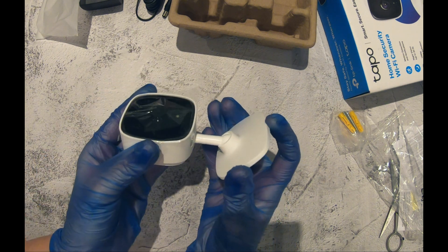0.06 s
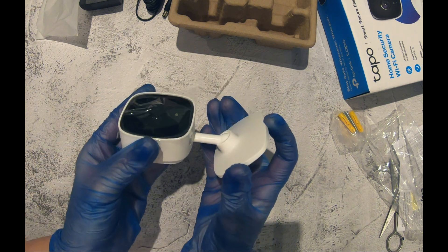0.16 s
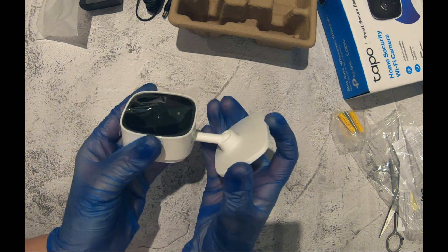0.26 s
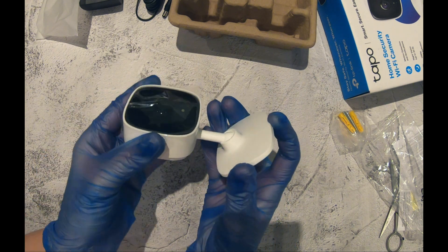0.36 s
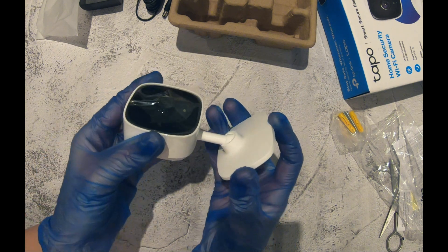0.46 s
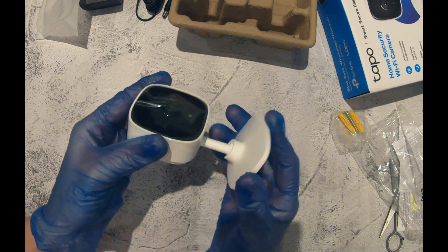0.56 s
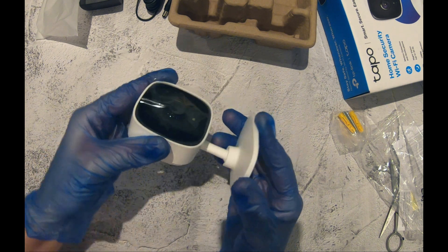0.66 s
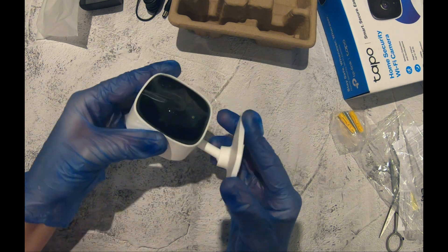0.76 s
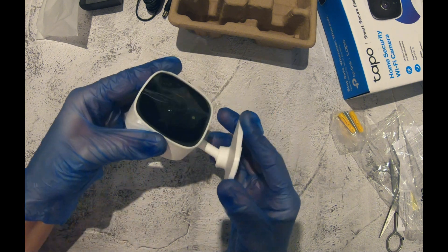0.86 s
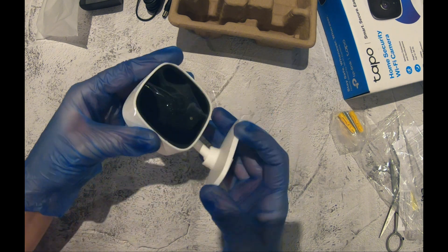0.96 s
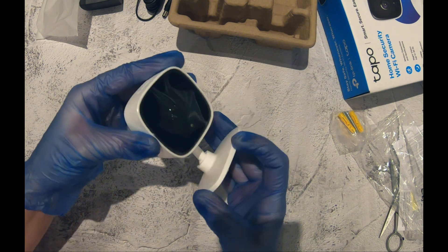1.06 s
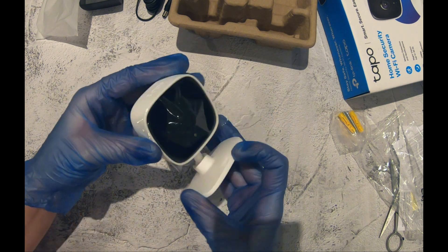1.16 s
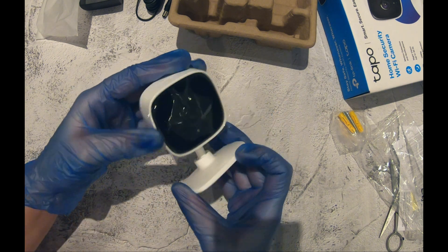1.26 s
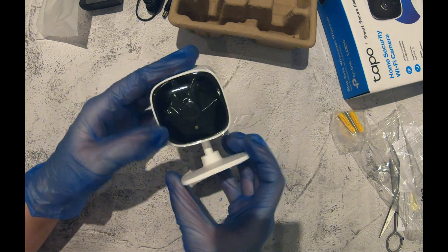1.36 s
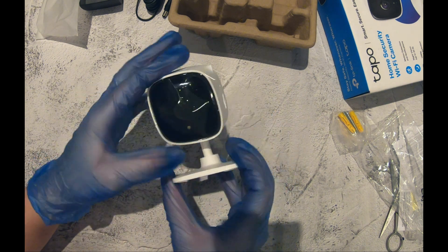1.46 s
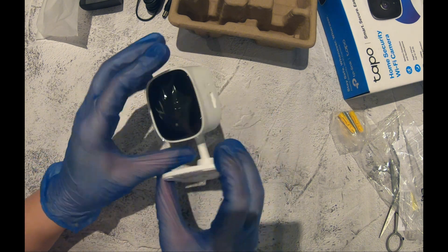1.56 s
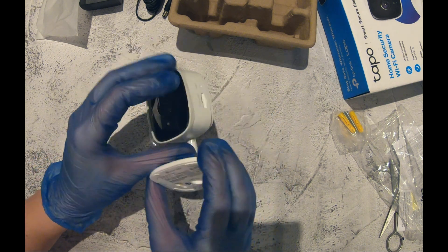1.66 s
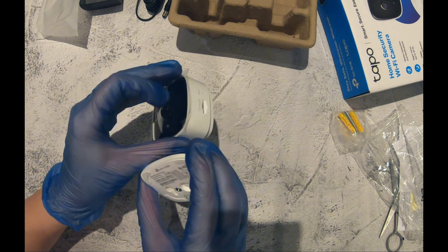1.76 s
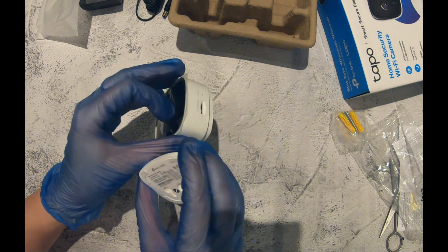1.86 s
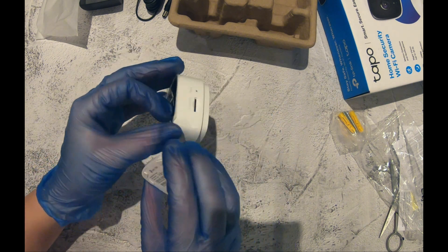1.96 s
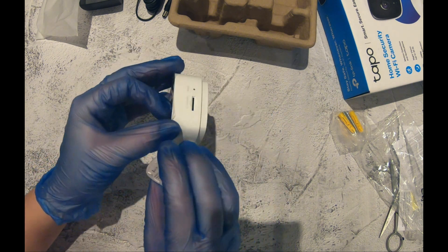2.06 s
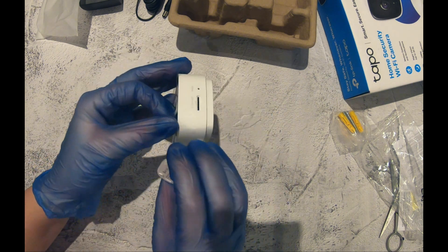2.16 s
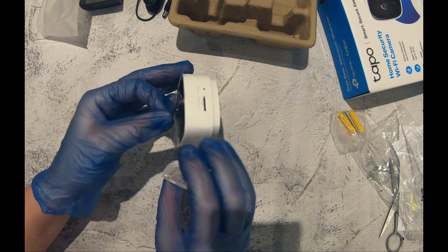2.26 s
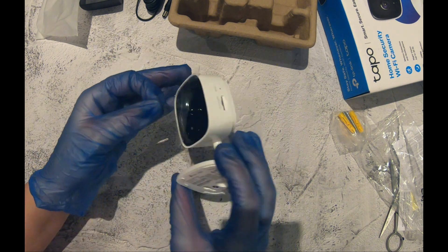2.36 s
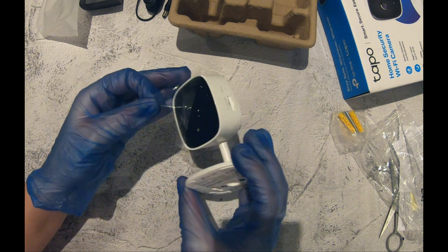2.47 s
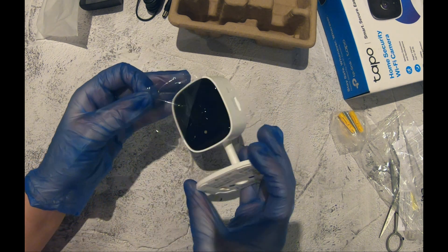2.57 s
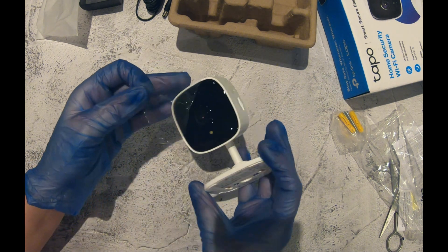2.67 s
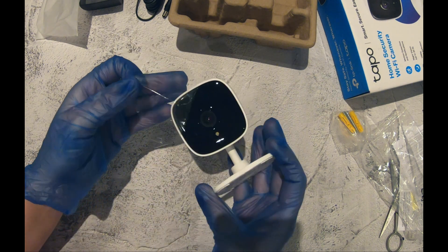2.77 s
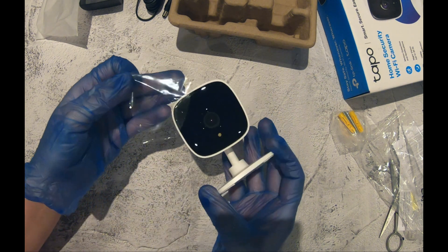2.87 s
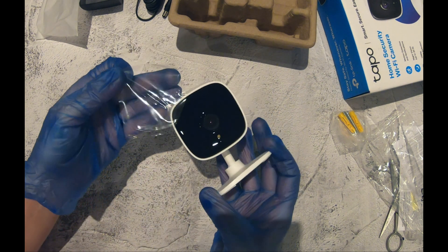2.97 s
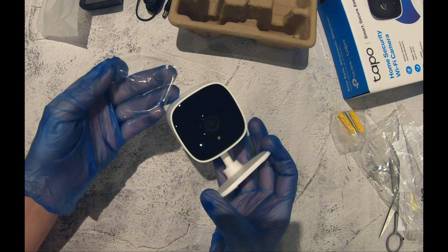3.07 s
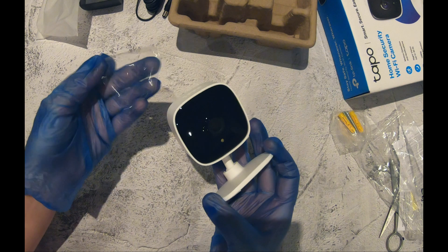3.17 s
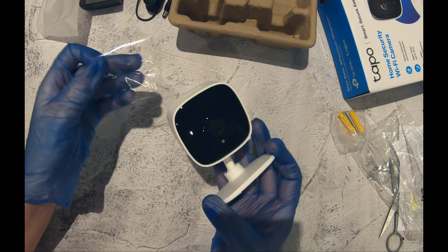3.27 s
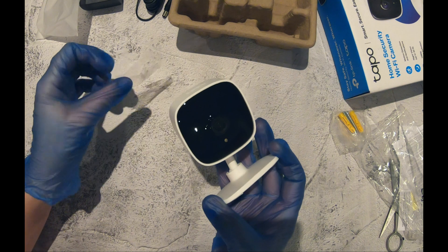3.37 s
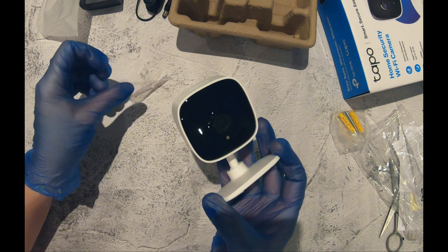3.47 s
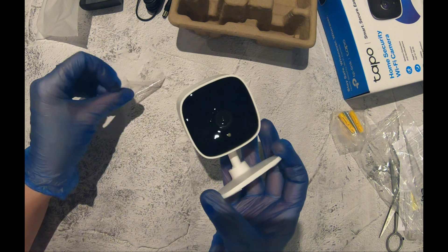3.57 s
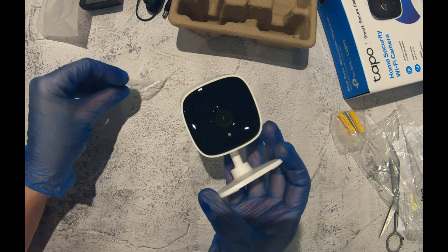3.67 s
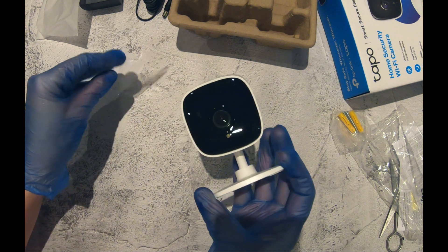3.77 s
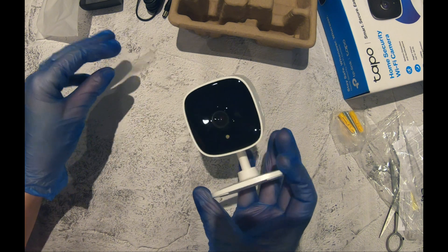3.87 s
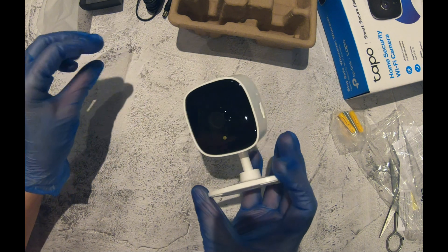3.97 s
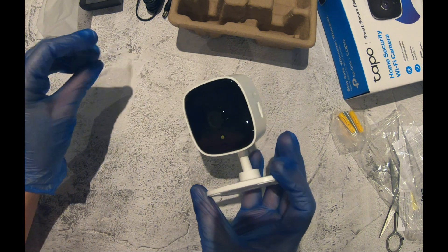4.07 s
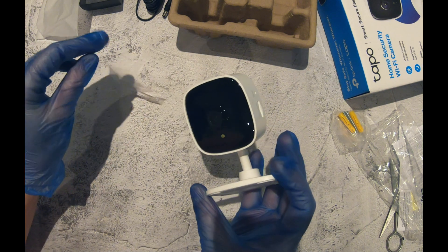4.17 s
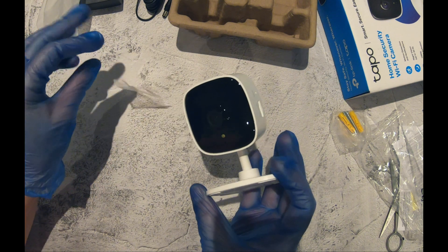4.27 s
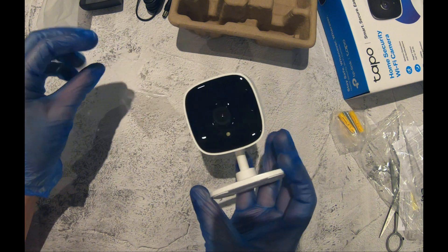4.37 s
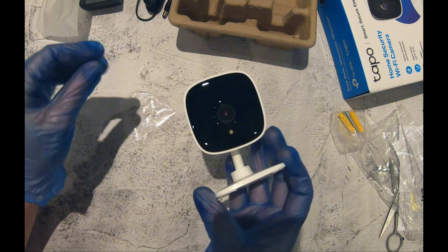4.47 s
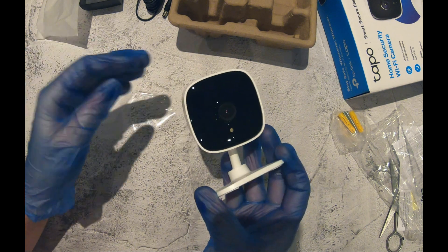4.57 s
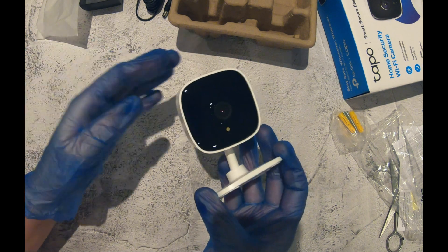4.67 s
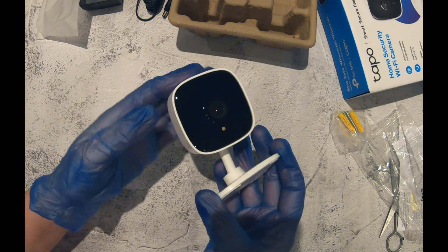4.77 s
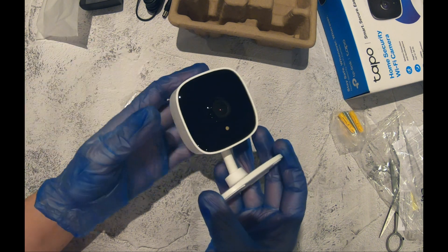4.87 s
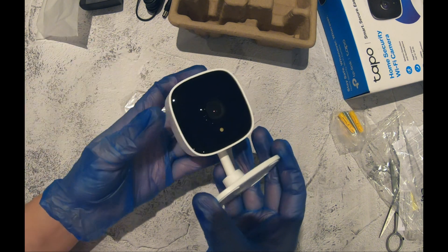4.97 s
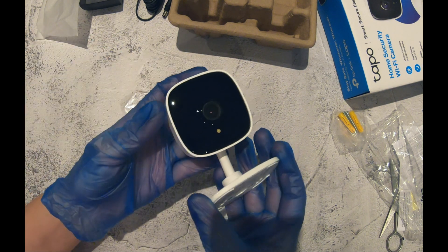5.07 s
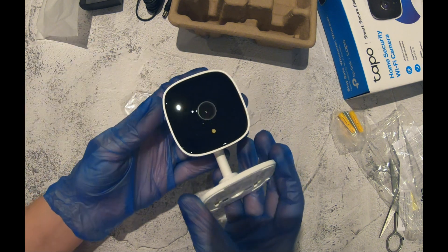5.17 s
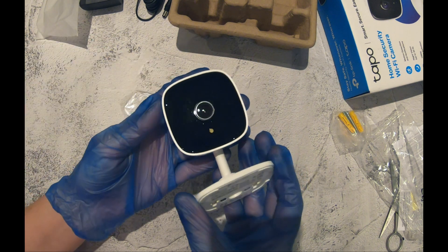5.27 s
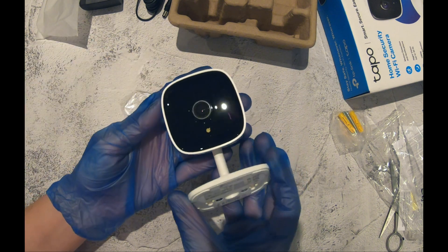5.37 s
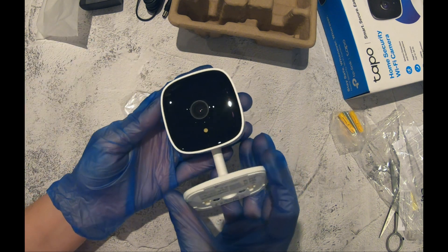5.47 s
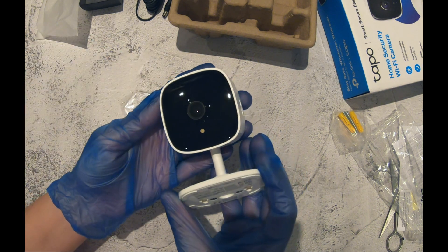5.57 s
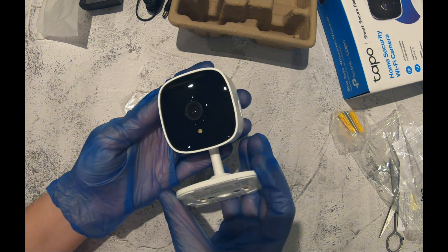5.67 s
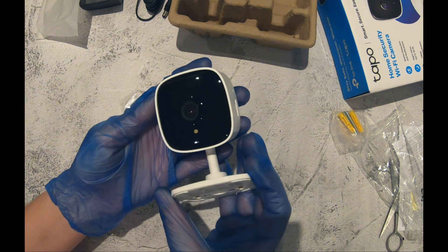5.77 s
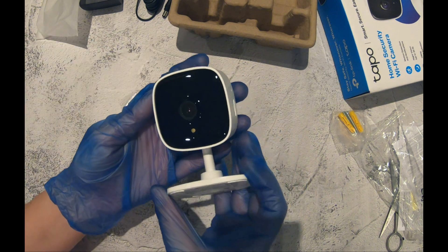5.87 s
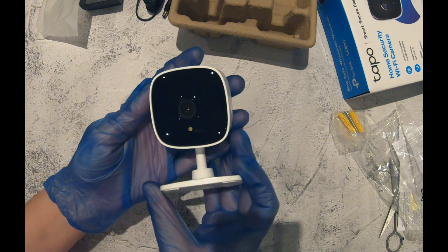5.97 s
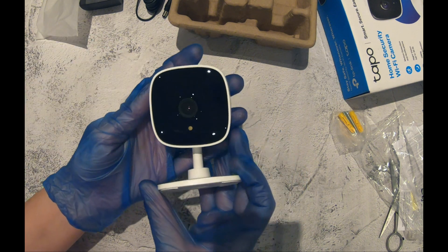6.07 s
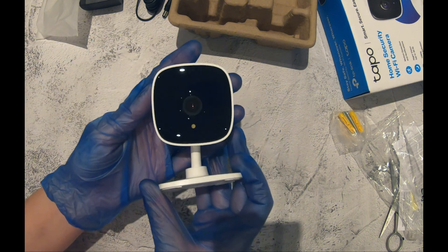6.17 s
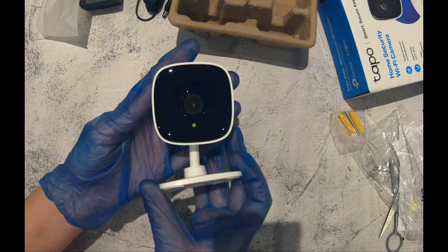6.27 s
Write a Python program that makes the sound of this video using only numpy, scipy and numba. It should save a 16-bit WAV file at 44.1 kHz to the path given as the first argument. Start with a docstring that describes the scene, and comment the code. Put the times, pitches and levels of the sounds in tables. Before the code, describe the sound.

Thin plastic gloves handle a small hollow plastic device close to the microphone in a small room. For the first two seconds there is soft rubbing and sliding with scattered light clicks, a finger dragging over the shell and a sharper click at about 1.5 seconds. At about 2.3 seconds a clinging film starts to peel off with a brief scrape that falls in pitch. It becomes a much louder, bright, crackling rustle with quick runs of ticks and sharp snaps, the strongest between 2.6 and 3 seconds. After 3.2 seconds the loose film and gloves crinkle softly, with a few small ticks and a light tap at about 4.3 seconds. From 5 seconds to the end, just past 6, only very faint rubbing remains. Faint distant traffic murmurs throughout, with a low wavering hum that dies away at around 4 seconds.

```python
"""Peeling film off a plastic device

Thin plastic gloves turn a small hollow plastic device over a table, peel a clinging film off its
front and flick it away. Gloves and film rustle in dense tiny slips, single creases snap, and the
shell rings briefly. Distant traffic murmurs through the walls, with a low wavering hum."""
import sys
import numpy as np
from scipy import signal
from scipy.fft import rfft, irfft, next_fast_len
from scipy.io import wavfile
from numba import njit

SR = 44100
rng = np.random.default_rng(int(sys.argv[2]) if len(sys.argv) > 2 else 0)


def bounce(signal):
    """Save signal as a 16-bit WAV file at the path given by the first command-line argument."""
    frames = np.transpose(np.atleast_2d(signal))
    limited = np.clip(frames, -1, 1)
    pcm = np.round(limited * 32767).astype(np.int16)
    wavfile.write(sys.argv[1], SR, pcm)


N = 279153

# Strokes of rubbing and peeling. Rise and fall each span 20 dB; the last three are relative levels. # (peak
# time [s], level [dB], rise [ms], fall [ms], treble [dB], shell body [dB], film hump [dB])
RUB_STROKES = [(0.026, -87, 85, 16.5, -7, -14, -20), (0.263, -81.0, 107.5, 53, -5, 1, -21),
               (0.402, -79.5, 42, 50, -12, -11, -12), (0.556, -74.5, 111, 141, -9, -7, -14),
               (0.676, -64, 74, 107.5, -7.5, -9.0, -22), (0.848, -80, 159, 150, -7, -11, -18),
               (1.03, -80.5, 155, 108, -1, -1, -15), (1.13, -77, 181, 348, 1.5, 0, -14),
               (1.294, -67.5, 96, 54, -24, -3, -30), (1.423, -62, 209.5, 62, -1, -6.5, -26),
               (1.498, -59.5, 27, 73, 1, -4, -25), (1.624, -63, 47, 90, -4.5, -8.0, -13),
               (1.787, -68, 90, 110, -10, -4.5, -20), (1.882, -73.5, 57, 85.5, -7.5, -11, -18),
               (2.06, -64.5, 101, 89, -4, -9.0, -26), (2.211, -69.5, 18.5, 26, -6, 3, -20),
               (2.34, -58, 118, 44, 3, -1, -22), (2.375, -45, 77, 83, 4, -13.5, -33),
               (2.443, -42, 125, 30, 4.5, -8, -12), (2.496, -42.5, 157.5, 74, -2.5, -8, -18),
               (2.579, -39, 64, 60, -8, -12.5, -30), (2.629, -47, 41.5, 51, 5.5, -2.5, -20),
               (2.668, -45.5, 16, 102, -5.5, -9.5, -25), (2.716, -41.5, 13, 9, -7, -5, -16),
               (2.767, -48, 12, 45, -4, -1.5, -5), (2.863, -50, 56, 116, 3, -9, -8),
               (2.936, -44.5, 33, 49.5, -0.5, -9.5, -8), (2.999, -52.5, 5.5, 98, -2.5, -9.5, -22),
               (3.108, -55.5, 22, 125, -3.5, -8, -24), (3.153, -51, 70.5, 28.5, 3, -2.5, -14),
               (3.302, -71, 15, 186, 3, 0, -31), (3.378, -65.5, 94, 54.5, -9.5, -19, -28),
               (3.433, -72, 34, 350, -5, -5.5, -18), (3.578, -68.5, 28, 13, -4, -12.0, -20),
               (3.633, -63.5, 49, 34.5, -9, -6, -18), (3.734, -69, 153, 53, 1, -5, 3),
               (3.86, -64.0, 126, 48, 0.5, -15.5, -4), (3.92, -74, 83, 152.5, -7, -9, -24),
               (4.12, -73, 128, 350, -1, -18, -18), (4.202, -63, 59, 81.5, 0.5, -8, -16),
               (4.244, -69, 21, 39, 3, -23, -10), (4.326, -65.5, 22, 100, -1, 3, -22),
               (4.424, -68, 60, 85, -10, -12, -14), (4.457, -69, 26, 353, 0.5, -13, -21),
               (4.606, -66.5, 55, 100.5, -5, -14, -13), (4.736, -74.5, 73, 145, -8, -10, 5),
               (4.82, -76.5, 43, 40.5, -5, -12, -16), (4.92, -89.5, 348, 325, 3, -1, 2),
               (5.083, -89.5, 10, 153, 1, 5, -16), (5.226, -87.5, 34, 116, -3.5, 4, -8.5),
               (5.789, -81.5, 26, 112, 3.5, -2, -1), (6.027, -83.0, 141, 242, -5.5, -2, -12),
               (6.239, -84.5, 63.5, 121, -5.0, 4.5, -2)]
# Tone of the gloves and film as the microphone hears them, with the microphone's dip near 8.8 kHz and its drop
# above 10.5 kHz: (frequency [Hz], level [dB])
RUSTLE_TONE = [(250, -33.5), (600, -17.5), (1200, -14.5), (2200, -5), (4200, 0), (8200, 1), (8800, -1.5),
               (10200, 0), (10800, -11), (12300, -5), (15500, -18)]
# How alike the rustle is on the left and right: (frequency [Hz], likeness [1 = the same])
RUSTLE_LIKENESS = [(300, .75), (1000, .8), (2500, .93), (5000, .62), (9000, .45), (15000, .45)]
# Pitches at which the hollow shell rings: (pitch [Hz], width [Hz], boost [dB]); in the rubbing each rings at
# half this width
SHELL_RINGS = [(2030, 360, 3), (3510, 660, 6.5), (4820, 117, 5.5), (6250, 680, 6), (8000, 840, 5),
               (10060, 1200, 7.5), (11990, 1100, 7.5)]
# The film lets go in runs of ticks:
# (start [s], end [s], rate [ticks/s], first level [dB], last level [dB])
TICK_RUNS = [(2.237, 2.282, 134, -68, -38), (2.56, 2.608, 270, -49, -32.5), (2.666, 2.7, 280, -30, -50),
             (2.768, 2.784, 270, -42.5, -40.5), (2.815, 2.863, 200, -41.5, -30.5),
             (3.087, 3.122, 267, -56, -44.5)]
# Snapping creases and taps: (time [s], level [dB], pitch [Hz], ring length [cycles],
# pulse centre [Hz], thump level [dB], left over right [dB])
CREASE_SNAPS = [ (0.392, -52, 1320, 15, 3100, -60, -1), (0.636, -46.5, 2770, 23, 3550, -61, -2),
                (0.968, -48, 860, 15, 1500, -75, 1), (1.172, -50, 3470, 9, 6000, -75, -9),
                (1.269, -46, 3340, 20, 3430, -76, -5), (1.497, -31, 4700, 24, 6040, -78, 5),
                (1.4994, -25.5, 4350, 28, 4450, -85, -1), (1.5014, -31, 2250, 23, 1050, -83, 1.5),
                (1.624, -37, 3350, 25, 3300, -57, .4), (1.763, -46.5, 3110, 8, 1480, -60, 2),
                (1.883, -47, 1500, 9.3, 3500, -77, 1), (2.035, -37, 3850, 11, 7020, -67, -2),
                (2.0362, -47, 1480, 21, 2490, -77, 3), (2.206, -47, 1470, 18, 3480, -54, 3),
                (2.263, -42, 10100, 12, 6000, -75, 3), (2.559, -25, 3600, 22, 1990, -50, .4),
                (2.647, -21, 3400, 12, 6760, -89, 1), (2.695, -32.5, 3400, 37, 5940, -80, -4),
                (2.7122, -29, 3500, 11, 6500, -73, 6.5), (2.7158, -18.5, 2050, 10, 5040, -104, 1.5),
                (2.7237, -33.5, 5600, 7.3, 3450, -58, -20), (2.7439, -24, 6200, 7.3, 4020, -86, 2.5),
                (2.75, -27, 6250, 9.9, 4960, -82, -4), (2.7627, -27, 6000, 17, 3460, -71, 8.8),
                (2.804, -29.5, 3600, 2.7, 2570, -67, 3), (2.822, -31, 8300, 10, 4540, -71.5, 6),
                (2.935, -19.5, 4790, 10, 3540, -65, 2), (2.998, -14.5, 3560, 9.3, 5500, -63.5, -2.4),
                (3.0037, -25.5, 4900, 51, 3430, -74, .4), (3.038, -37, 2000, 23, 810, -50.5, 1),
                (3.074, -50.5, 700, 19, 5000, -68, -3), (3.093, -38, 3400, 13, 6000, -75, 4),
                (3.150, -34.5, 2300, 42, 880, -52, 0), (3.302, -44, 6100, 27, 8000, -73, 5),
                (3.477, -47.5, 856, 8, 2200, -63, 9.5), (3.564, -42, 8280, 31, 9950, -51, 5),
                (3.595, -47.5, 6000, 30, 5800, -69, 3), (4.3206, -28, 1560, 8, 2750, -44, 2),
                (4.35, -36, 770, 4.4, 2900, -64, 2)]
# Air pocket under the lifting film: (time [s], pitch [Hz], level [dB])
POCKET_GLIDE = [(2.26, 3800, -120), (2.29, 3660, -68), (2.315, 3300, -51), (2.34, 2440, -43),
                (2.365, 1980, -41.5), (2.385, 1810, -42), (2.4, 1350, -41.5), (2.42, 880, -69),
                (2.53, 558, -59), (2.57, 562, -46), (2.61, 556, -61.5), (2.66, 545, -120)]
# A finger dragged over the shell: (peak time [s], level [dB], rise [ms], fall [ms])
FINGER_DRAGS = [(1.2, -71, 250, 100), (1.275, -59, 65, 110), (1.43, -62.5, 200, 52)]
# Tone of the traffic through the walls: (frequency [Hz], level [dB])
TRAFFIC_TONE = [(15, -37), (25, -15), (64, -15.5), (102, -22.5), (155, -5.5), (281, -10), (320, -14.5),
                (449, -15.5), (489, -18.5), (780, -4), (1300, -16.5), (1670, -19.5), (2210, -30),
                (4000, -43), (5200, -59), (8800, -120)]
# Slow swell of the traffic: (time [s], level [dB], left over right [dB], tyre hiss boost [dB])
TRAFFIC_SWELL = [(0.0, -68.5, -1, 2.5), (0.46, -67.5, -1.5, 2), (0.97, -66, -0.5, 2.5),
                 (1.89, -70, -2, 5.5), (2.5, -67, 0, 5), (3.26, -70, -1, 3.5), (4.28, -69, -1, 6),
                 (4.9, -67, -1.5, 1.5), (5.5, -66.5, -2, 4.5), (6.33, -66.5, -0.5, 1.5)]
# How alike the traffic is on both sides: (frequency [Hz], likeness [1 = the same, below 0 = opposed])
TRAFFIC_LIKENESS = [(25, 0.53), (60, 0.85), (180, 0.62), (550, -0.54), (1650, -0.38), (4970, -1.2),
                    (15000, -0.36)]
# Low boom of the room under the traffic: (time [s], level [dB])
BOOM_LEVELS = [(0.0, -72), (0.32, -68), (0.67, -75.5), (0.69, -67), (1.87, -75), (1.97, -79), (1.99, -66.5),
               (2.7, -78), (2.71, -65), (2.75, -71), (2.82, -63), (2.86, -76.5), (3.52, -72.5), (3.56, -67),
               (3.68, -75), (4.28, -83), (4.32, -63), (4.41, -73), (4.48, -66), (4.53, -86), (4.62, -65.5),
               (4.95, -67.5), (5.01, -78), (5.85, -68.5), (5.89, -76), (6.33, -70)]
# Lowest pitches at which the room rings: (pitch [Hz], width [Hz], level [dB])
ROOM_RINGS = [(157.1, 12, 1), (199.7, 20, -2), (228.4, 8.97, -8.5), (58.9, 16, -17.5), (134, 10, -2.5)]
# Wavering low hum: (time [s], level [dB])
HUM_LEVELS = [(0.0, -70), (0.34, -72.5), (0.47, -85.5), (0.75, -62.5), (1.34, -82), (1.37, -90),
              (1.61, -71), (1.72, -80), (2.37, -61.5), (2.49, -78), (2.53, -65.5), (3.45, -78), (3.57, -63),
              (4.01, -101), (4.1, -81)]
# A far engine: (time [s], firing pitch [Hz], level [dB])
ENGINE_RUN = [(0, 111, -100), (.6, 114.5, -85), (1, 114.2, -75.5), (1.8, 115, -78.5), (2.4, 116.2, -77),
              (2.7, 118, -100)]

CRACKLE_SHARE = 0.49   # the rest of the rubbing is smooth sliding
HOLLOW_HZ, HOLLOW_WIDTH_HZ = 5620, 2800   # the crumpled film's bright hump
DRAG_HZ, DRAG_WIDTH_HZ = 3310, 440
PULSE_DB, SNAP_TAIL_FADE_S = -4, 0.0078   # a fade time is the time to drop by 60 dB
HUM_HZ, HUM_RISE_HZ_PER_S = 134.5, 1.6
ROOM_FADE_S, ROOM_DB = 0.1, -13
HISS_DB, CUTOFF_HZ = -84.5, 16000
SIDES = np.array([[1], [-1]])   # left, right
TONE_GRID_HZ = np.linspace(0, SR / 2, 1025)
# Tone of the microphone's hiss: (frequency [Hz], level [dB])
HISS_TONE = [(1000, -39), (2500, -5), (6500, -9), (8500, -13), (10300, -15.5), (11000, -16.5), (15500, -30)]


def rustle():
    """Gloves and film slide and crackle; the sound rings in the shell, and the crumpled film adds a bright
    hump."""
    level_db, treble_db, body_db, hollow_db = swells(RUB_STROKES)
    sliding = rng.standard_normal((2, N))
    source = np.sqrt(1 - CRACKLE_SHARE) * sliding + np.sqrt(CRACKLE_SHARE) * crackle()
    rubbing = source[0].copy()
    for hz, width_hz, db in SHELL_RINGS:
        ring = signal.lfilter(*signal.iirpeak(hz, 2 * hz / width_hz, SR), rubbing)
        source[0] += amp(db - 16 + 6.2 * drift(17)) * ring   # the shifting grip frees and damps it
    sound = colour(stereo(source, RUSTLE_LIKENESS), at_hz(RUSTLE_TONE, TONE_GRID_HZ))
    body = signal.sosfiltfilt(pass_filter(2000, "low"), sound)
    treble = signal.sosfiltfilt(pass_filter(5500, "high"), sound)
    mix = unit_level(sound - body - treble)   # the middle range
    mix += amp(treble_db + drift(56)) * unit_level(treble)
    mix += amp(body_db) * unit_level(body)
    mix += amp(hollow_db) * band(rubbing, HOLLOW_HZ, HOLLOW_WIDTH_HZ)
    return amp(level_db) * mix * amp(0.45 * SIDES)


def crackle():
    """Slips come in clumps; the film cannot store enough strain for a very large one."""
    clumps = amp(1.8 * drift(70) + 3.5 * drift(220))
    clicks = unit_level(clumps * slips(per_s=1600, spread_db=2.5))
    return unit_level(np.tanh(clicks / 6))


def slips(per_s, spread_db):
    """Plastic sticks, then slips: two rows of tiny clicks of uneven size."""
    at = np.flatnonzero(rng.random(2 * N) < per_s / SR)
    sizes = amp(spread_db * np.minimum(rng.exponential(1, len(at)), 5))
    clicks = np.zeros(2 * N)
    clicks[at] = sizes * np.sign(rng.random(len(at)) - .5)
    return unit_level(clicks.reshape(2, N))


def peel_ticks():
    """The film lets go in nearly even ticks, each a short bright burst through the shell."""
    clicks = np.zeros(N)
    for start, end, per_s, first_db, last_db in TICK_RUNS:
        times = start + np.cumsum((1 + .3 * rng.standard_normal(40)) / per_s)
        level_db = np.interp(times, [start, end], [first_db, last_db]) + 1.9 * rng.standard_normal(40)
        clicks[(times * SR).astype(int)] = amp(level_db) * (times < end)
    fades = signal.lfilter([1], [1, -.85], 2 * clicks)
    middle, side = rng.standard_normal((2, N)) * fades
    return colour(middle + .4 * side * SIDES, at_hz(RUSTLE_TONE, TONE_GRID_HZ) + shell_boost_db())


def snaps():
    """A crease gives way: a sharp pulse, a brief ring, a noisy tail and a low thump."""
    t = np.arange(3000) / SR
    out = np.zeros((2, N + len(t)))
    tail_filter = pass_filter([900, 9000], "band")
    for start, level_db, hz, cycles, pulse_hz, thump_db, pan_db in CREASE_SNAPS:
        middle, side = rng.standard_normal((2, len(t)))
        noise = (middle + 0.35 * side * SIDES) * amp(-14.5 - 60 * t / SNAP_TAIL_FADE_S)
        tail = signal.sosfilt(tail_filter, noise)
        ring = np.sin(2 * np.pi * hz * t) * amp(-3.5 - 60 * t * hz / cycles)
        u = np.pi * pulse_hz * t - 3
        pulse = (1 - 2 * u ** 2) * np.exp(-u ** 2)   # a push with a dip on either side
        thump = np.sin(2 * np.pi * 200 * t) * amp(thump_db - 60 * t / 0.073)
        thump *= 1 - np.exp(-t / 0.0011)   # soft start
        snap = amp(level_db) * (ring + amp(PULSE_DB) * pulse + tail) + thump
        i = round((start + 0.0008) * SR)   # each snap sounds 0.8 ms after its listed time
        out[:, i:i + len(t)] += amp(pan_db / 2 * SIDES) * snap
    out = signal.sosfilt(pass_filter(140, "high"), out)
    return colour(out, shell_boost_db() - 2)


def shell_boost_db():
    """The hollow shell boosts sound near each pitch at which it rings."""
    return sum(db / (1 + (2 * (TONE_GRID_HZ - hz) / width_hz) ** 2) for hz, width_hz, db in SHELL_RINGS)


def air_pocket():
    """Slips ring in the air under the lifting film; the pocket grows, so its pitch falls."""
    hz, level_db = in_time(POCKET_GLIDE)
    sound = slips(per_s=3000, spread_db=0.5)[0]
    for width_hz in (850, 1200):
        sound = unit_level(gliding_ring(sound, hz, width_hz))
    return amp(level_db) * sound * amp(1.5 * drift(74))


def finger_drag():
    """A finger slips over the shell in dense clicks that ring in one hollow."""
    ring = band(slips(per_s=3300, spread_db=1)[0], DRAG_HZ, DRAG_WIDTH_HZ)
    return amp(swells(FINGER_DRAGS)[0]) * ring


def room_echo(x):
    """The small room adds a short blurred echo, different on each side."""
    t = np.arange(int(.3 * SR)) / SR
    tail = rng.standard_normal((2, len(t))) * amp(-60 * t / ROOM_FADE_S) * (t > .004)
    tail = signal.lfilter([1], [1, -.5], tail)   # soften the treble
    tail /= np.sqrt(np.sum(tail[0] ** 2))
    return amp(ROOM_DB) * signal.oaconvolve(x, tail, axes=1)[:, :N]


def traffic(noise):
    """Far traffic murmurs and swells a little, with more or less tyre hiss on top."""
    level_db, pan_db, tyres_db = in_time(TRAFFIC_SWELL)
    murmur = unit_level(colour(noise, at_hz(TRAFFIC_TONE, np.linspace(0, SR / 2, 4097))))
    tyres = signal.sosfiltfilt(pass_filter(1050, "high"), murmur)
    gain = amp(level_db + pan_db / 2 * SIDES + 0.22 * drift(5))
    return gain * (murmur + (amp(tyres_db) - 1) * tyres)


def room_boom(noise):
    """Noise booms at the lowest pitches at which the room rings."""
    grid_hz = np.linspace(0, SR / 2, 16385)
    power = sum(amp(2 * db) / width_hz / (1 + (2 * (grid_hz - hz) / width_hz) ** 4)
                for hz, width_hz, db in ROOM_RINGS)
    boom = unit_level(colour(noise, 10 * np.log10(power + 1e-12)))
    return amp(in_time(BOOM_LEVELS)[0]) * boom


def low_hum():
    """A low tone wavers in level, creeps up in pitch and dies away."""
    t = np.arange(N) / SR
    level_db = in_time(list(HUM_LEVELS) + [(4.4, -110)])[0]
    phase = 2 * np.pi * (HUM_HZ + HUM_RISE_HZ_PER_S * t / 2) * t
    return np.sqrt(2) * amp(level_db) * np.sin(phase)


def far_engine():
    """An engine drones at its firing pitch, and at half and double that pitch."""
    hz, level_db = in_time(ENGINE_RUN)
    phase = 2 * np.pi * np.cumsum(hz) / SR
    return amp(level_db) * (np.sin(phase) + amp(-6.5) * np.sin(phase / 2) + np.sin(2 * phase))


def swells(rows):
    """Strokes rise, fall and add up in power; any extra columns blend by each stroke's share."""
    peak_s, peak_db, rise_ms, fall_ms, *columns = np.transpose(rows)[:, :, None]
    t = np.arange(0, N + 44, 44) / SR
    from_peak = 1000 * np.maximum((peak_s - t) / rise_ms, (t - peak_s) / fall_ms)
    power = amp(2 * np.maximum(peak_db - 20 * from_peak ** 1.5, -200))   # 1.5 rounds the top
    total = power.sum(axis=0)
    blends = [(power * column).sum(axis=0) / total for column in columns]
    return in_time(np.transpose([t, 10 * np.log10(total)] + blends))


def amp(db):
    """Turn decibels into a multiplier."""
    return 10 ** (np.asarray(db) / 20)


def unit_level(x):
    """Scale a signal to an average (rms) level of 1."""
    return x / np.sqrt(np.mean(x ** 2) + 1e-20)


def in_time(rows):
    """Turn table columns into curves with a value at every sample."""
    times, *columns = np.transpose(rows)
    return [np.interp(np.arange(N) / SR, times, column) for column in columns]


def at_hz(rows, hz):
    """Read a table between its rows, on a log-frequency scale."""
    row_hz, values = np.transpose(rows)
    return np.interp(np.log(hz + 1), np.log(row_hz), values)


def drift(rate_hz):
    """A smooth random wobble with a typical size of 1."""
    r = np.exp(-80 * np.pi * rate_hz / SR)
    slow = signal.lfilter([1], [1, -2 * r, r * r], rng.standard_normal(N // 40 + 2002))[2000:]
    return np.interp(np.arange(N) / 40, np.arange(len(slow)), unit_level(slow))


def colour(x, gain_db):
    """Shape the tone with gains spaced evenly from 0 Hz to SR / 2."""
    cepstrum = irfft(gain_db * np.log(10) / 20)
    half = len(cepstrum) // 2
    cepstrum[1:half] *= 2   # minimum phase: nothing rings before the sound that starts it
    cepstrum[half + 1:] = 0
    response = irfft(np.exp(rfft(cepstrum)))
    return signal.oaconvolve(np.atleast_2d(x), response[None], axes=1)[:, :N]


def pass_filter(hz, kind):
    """A gentle filter that lets the lows, the highs or one band through."""
    return signal.butter(2, hz, kind, fs=SR, output="sos")


def band(x, hz, width_hz):
    """Keep one band of frequencies, at level 1."""
    return unit_level(signal.sosfilt(pass_filter([hz - width_hz / 2, hz + width_hz / 2], "band"), x))


@njit
def gliding_ring(x, hz, width_hz):
    """Make a signal ring at a moving pitch."""
    turn = np.cos(2 * np.pi * hz / SR)
    r = np.exp(-np.pi * width_hz / SR)
    out = np.zeros_like(x)
    for i in range(2, len(x)):
        out[i] = x[i] - x[i - 2] + 2 * r * turn[i] * out[i - 1] - r * r * out[i - 2]
    return out


def stereo(pair, likeness):
    """Mix two unrelated signals into a left and right that are as alike as the table says."""
    size = next_fast_len(N, True)
    alike = np.clip(at_hz(likeness, np.linspace(0, SR / 2, size // 2 + 1)), -.99, .99)
    middle, side = rfft(pair, size)
    return irfft(np.sqrt(1 + alike) * middle + np.sqrt(1 - alike) * side * SIDES, size)[:, :N]


def scene():
    """Hands close by in a small room, traffic and hum far off."""
    hands = rustle() + peel_ticks() + snaps() + air_pocket() + finger_drag()
    # the right microphone is a little further away: a delay of a fraction of a sample
    hands[1] = signal.lfilter([.4, 1], [1, .4], hands[1])
    far = stereo(rng.standard_normal((2, N)), TRAFFIC_LIKENESS)
    return hands + room_echo(hands) + traffic(far) + room_boom(far[:, ::-1]) + low_hum() + far_engine()


def record(dry):
    """The microphone adds its own hiss; the highest treble is cut."""
    hiss = colour(rng.standard_normal((2, N)), at_hz(HISS_TONE, TONE_GRID_HZ))
    treble_cut = signal.cheby2(12, 60, CUTOFF_HZ, fs=SR, output="sos")
    return signal.sosfilt(treble_cut, dry + amp(HISS_DB) * unit_level(hiss))


dry = scene()
out = record(dry)
bounce(out)
```